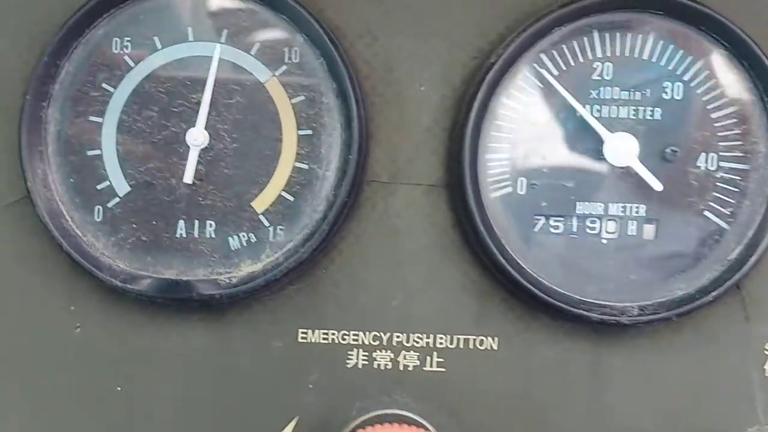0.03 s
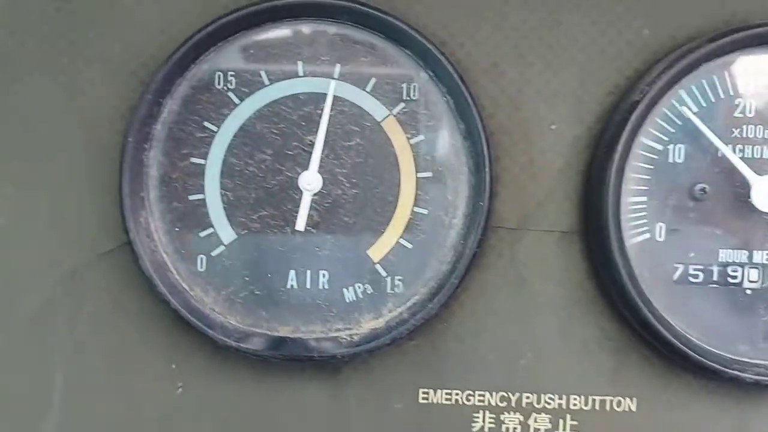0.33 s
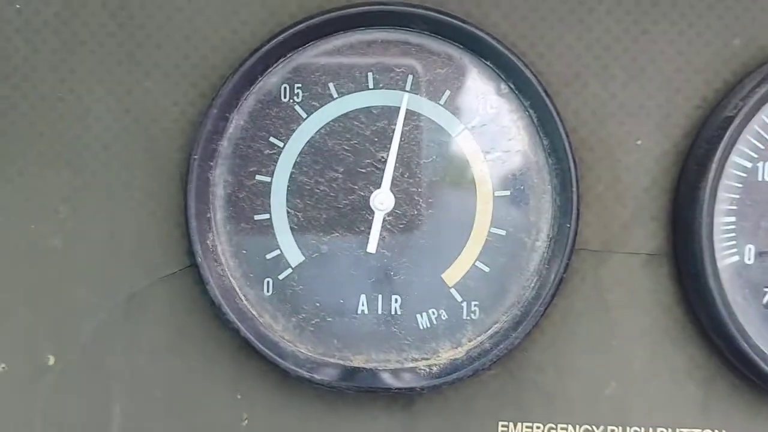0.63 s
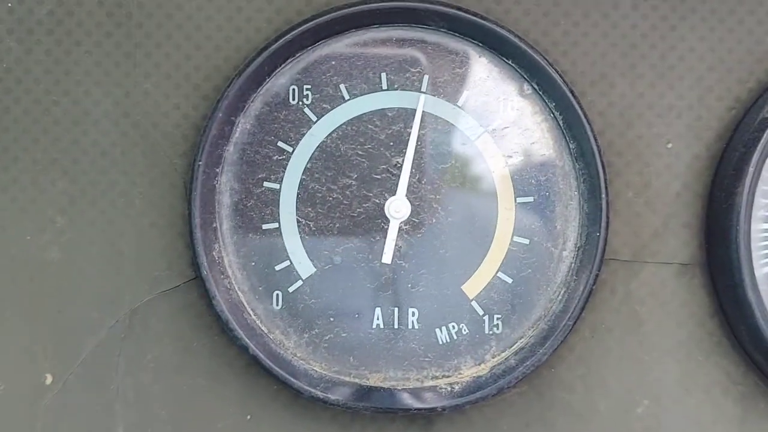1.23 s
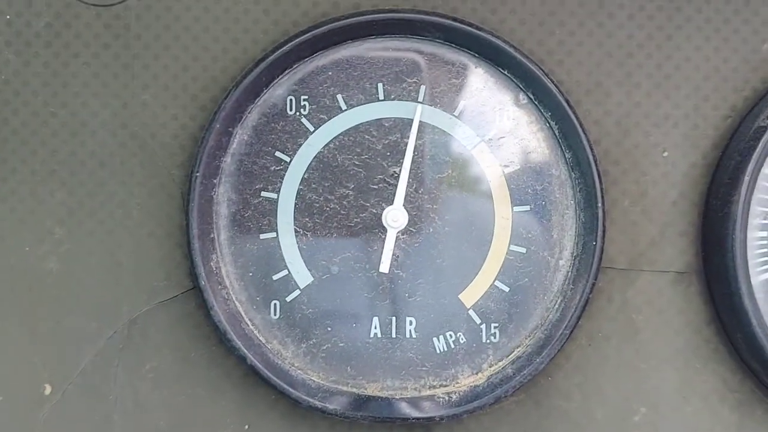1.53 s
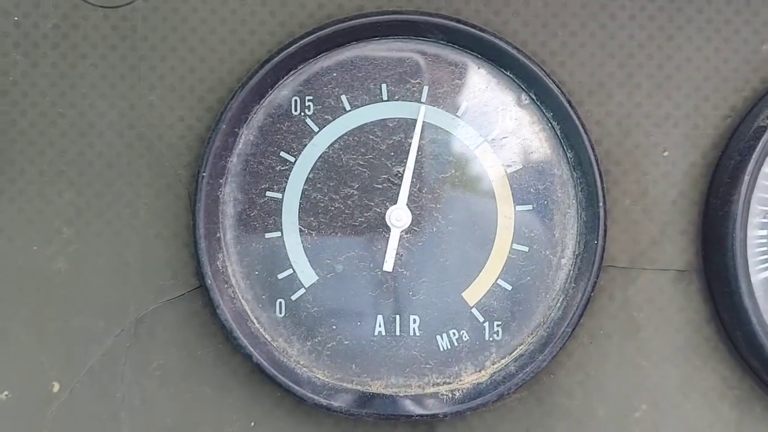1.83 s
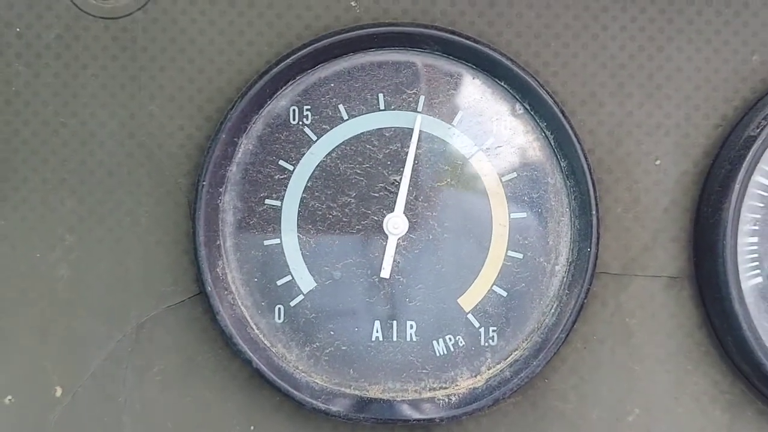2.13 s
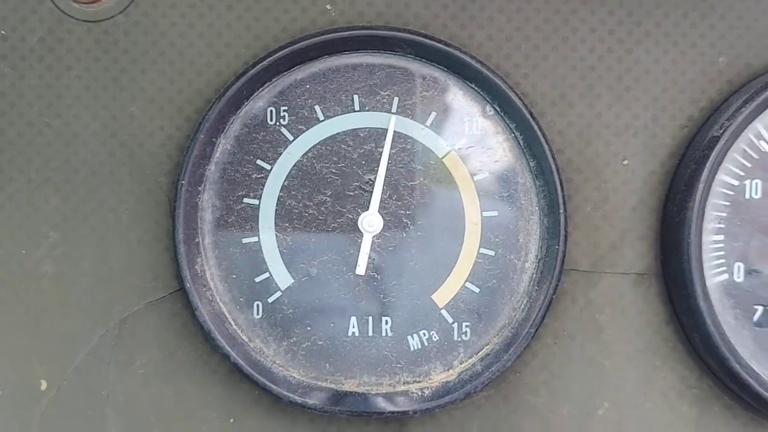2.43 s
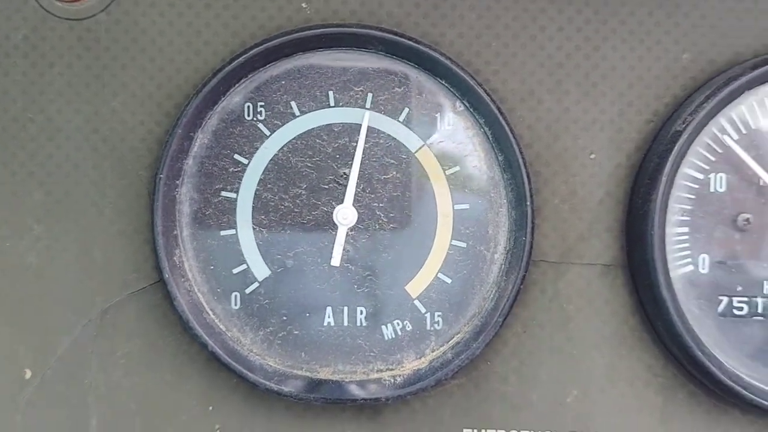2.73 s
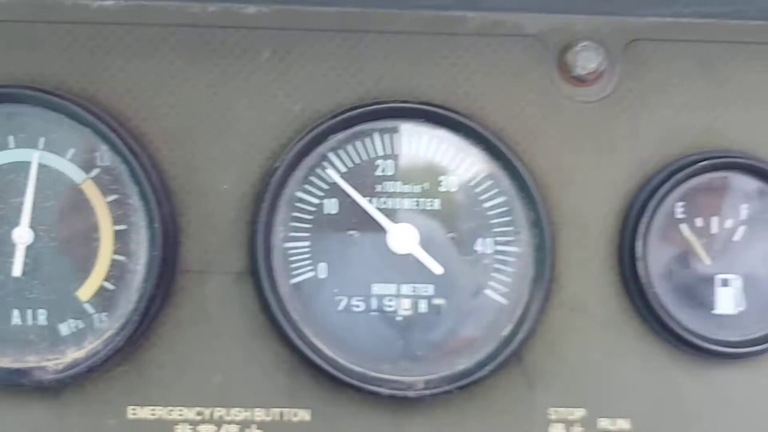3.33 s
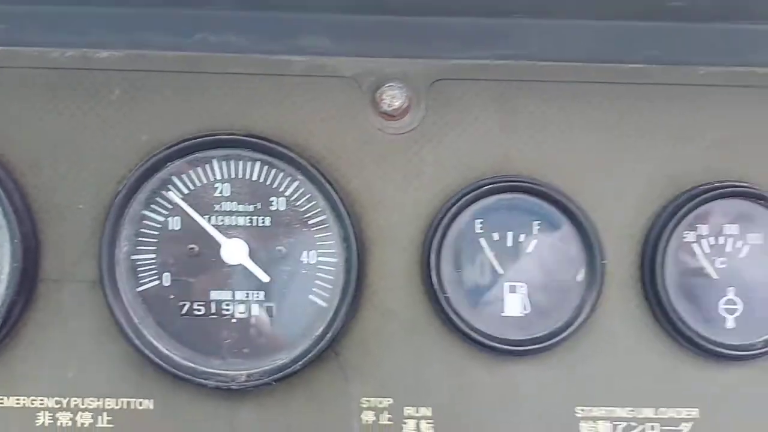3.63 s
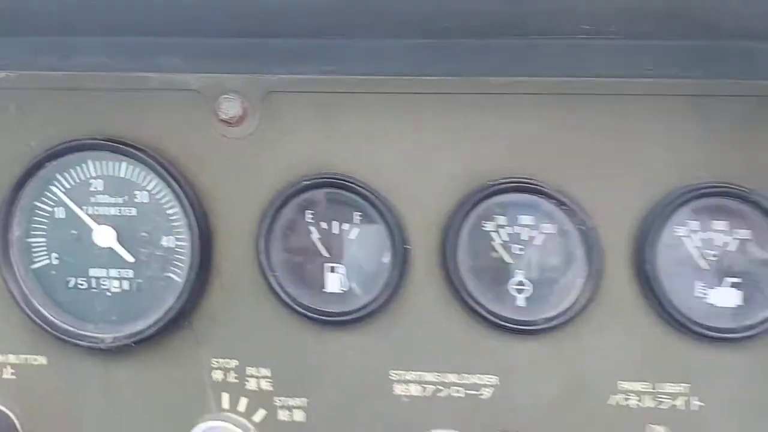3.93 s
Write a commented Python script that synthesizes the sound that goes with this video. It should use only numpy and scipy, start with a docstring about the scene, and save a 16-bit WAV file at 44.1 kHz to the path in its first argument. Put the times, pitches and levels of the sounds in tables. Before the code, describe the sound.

Close to its control panel, a diesel-driven air compressor drones and throbs at constant speed, with humming, buzzing and softly hissing cooling air. As the microphone moves along the panel, the drone dips a little and the whirr grows.

```python
"""A four-cylinder diesel drones and throbs as it drives an air compressor, heard by the control panel.
Its firings make a stack of low tones and pulse the exhaust rumble; the housing buzzes on every cycle.
The rotor lobes hum, fan and drive add a few tones, and cooling air whirrs and hisses. Towards the end
the listener moves along the panel: the drone eases a little and the whirr comes forward."""
import sys
import numpy as np
from scipy import signal
from scipy.fft import rfft, irfft
from scipy.io import wavfile
from scipy.ndimage import uniform_filter1d, minimum_filter1d

SR = 44100
rng = np.random.default_rng(int(sys.argv[2]) if len(sys.argv) > 2 else 0)


def waveform_to_disk(signal):
    """Save audio, clipped to [-1, 1], as 16-bit WAV at the path in sys.argv[1]."""
    frames = np.transpose(np.atleast_2d(signal))
    scaled = np.clip(frames, -1, 1) * 32767
    samples = np.round(scaled).astype(np.int16)
    wavfile.write(sys.argv[1], SR, samples)


N = 176400
CRANK_HZ, FIRINGS_PER_TURN = 1392.1 / 60, 2


def from_db(db):
    """Decibels to gain."""
    return 10 ** (np.asarray(db) / 20)


def fader(rows):
    """Gain at every sample, from rows of seconds and dB."""
    return from_db(np.interp(np.arange(N) / SR, *np.transpose(rows)))


def at_hz(rows, hz, column=1):
    """One column of a spectrum table, read on a log-frequency axis."""
    rows = np.array(rows)
    return np.interp(np.log(np.maximum(hz, 1)), np.log(rows[:, 0]), rows[:, column])


def drift(rate_hz):
    """Smooth random motion with a spread of 1."""
    hop, settle = 100, 2000
    pole = np.exp(-2 * np.pi * rate_hz * hop / SR)
    noise = rng.standard_normal(N // hop + settle + 2)
    slow = signal.lfilter([1], [1, -2 * pole, pole * pole], noise)[settle:]
    return np.interp(np.arange(N) / hop, np.arange(len(slow)), (slow - slow.mean()) / slow.std())


def turns_at(hz, wander):
    """Running count of cycles at a rate that wanders by a small fraction."""
    return np.cumsum(hz * (1 + wander * drift(1.5))) / SR


def split(x, hz):
    """The parts below and above a crossover."""
    low = irfft(rfft(x) / (1 + (np.fft.rfftfreq(N, 1 / SR) / hz) ** 6), N)
    return low, x - low


def partial(turns, hz, ears_db, waver_db):
    """A wavering stereo sine; the ears part in phase as pitch rises, by one radian at 600 Hz."""
    apart = rng.choice([-1, 1]) * min((hz / 600) ** 1.6, 2) * np.array([[.5], [-.5]])
    level_db = np.array(ears_db)[:, None] + waver_db * drift(rate_hz=1)
    return np.sqrt(2) * from_db(level_db) * np.sin(2 * np.pi * turns + apart)


def even_running(orders, levels, tries=100, exhaust_top_hz=200):
    """Start phases in turns: low firing orders line up, the rest take the scatter that lopes least."""
    exhaust = orders * CRANK_HZ < exhaust_top_hz
    starts = rng.random((len(orders), tries))
    starts[exhaust & (orders % FIRINGS_PER_TURN == 0)] = 0
    phasors = (levels * exhaust)[:, None] * np.exp(2j * np.pi * starts)
    lope = 0
    for gap in (.5, 1):  # orders this close beat slower than the firings
        neighbours = (orders[:, None] - orders == gap) @ phasors
        lope += abs(np.sum(phasors.conj() * neighbours, axis=0)) ** 2
    return starts[:, np.argmin(lope)]


# The drone's tones. Each row: multiple of the crank speed, left level in dB, right level in dB.
ENGINE_ORDERS = [(2.0, -37.5, -39), (4.0, -16, -16.5), (5.0, -44, -65), (5.5, -35, -28.5),
                 (6.0, -19.5, -20), (6.5, -26.5, -25.5), (7.0, -25.5, -27), (7.5, -42.5, -41),
                 (8.0, -24, -22.5), (9.0, -40, -43), (9.5, -36.5, -43.5), (10.0, -36.5, -41),
                 (10.5, -38, -45), (11.5, -37, -31.5), (12.0, -46, -34), (12.5, -60, -41),
                 (13.0, -30.5, -29.5), (13.5, -33.5, -39.5), (14.0, -35.5, -48), (14.5, -26, -29.5),
                 (15.0, -37, -31), (15.5, -32, -36.5), (16.0, -30, -36), (16.5, -35.5, -33.5),
                 (17.5, -56, -36), (18.0, -34, -42.5), (18.5, -38, -40), (19.0, -39.5, -39.5),
                 (19.5, -50, -38), (20.0, -36, -30), (21.5, -41.5, -36.5), (22.0, -33.5, -39.5),
                 (22.5, -39, -43), (23.0, -57, -44.5), (23.5, -49, -43), (24.0, -65, -49), (24.5, -66, -58),
                 (26.0, -66, -48), (28.0, -46, -47), (28.5, -51, -45.5)]

def engine(crank):
    """Multiples of the firing rate form exhaust pulses; unequal cylinders add the orders between."""
    table, drone = np.array(ENGINE_ORDERS), np.zeros((2, N))
    orders, ears = table[:, 0], table[:, 1:]
    starts = even_running(orders, from_db(ears.mean(axis=1)))
    for order, ears_db, start in zip(orders, ears, starts):
        waver_db = 1.82 if order % FIRINGS_PER_TURN else .52  # firing orders hold steadier
        drone += partial(order * crank + start, order * CRANK_HZ, ears_db, waver_db)
    return drone


# Stereo image of the noise. Each row: frequency in Hz, left-right correlation (1 is mono).
EAR_LIKENESS = [(30, 0.62), (60, 0.84), (110, 1), (180, 0.99), (250, 0.96), (350, .82), (500, 0.87),
                (700, 0.21), (1300, -0.25), (2500, -0.0061)]

def ear_noise(hz, size):
    """Spectrum of stereo white noise, centred in the bass and wide in the treble."""
    mid, side = rfft(rng.standard_normal((2, size)))
    alike = np.clip(at_hz(EAR_LIKENESS, hz), -.99, .99)
    return np.sqrt((1 + alike) / 2) * mid + np.sqrt((1 - alike) / 2) * side * [[1], [-1]]


# Tone colour of the panels. Each row: frequency in Hz, level per harmonic in dB.
PANEL_BUZZ = [(60, -54), (250, -54), (520, -55), (700, -61), (1100, -64.5), (1700, -72), (3000, -82.5),
              (5000, -89)]

def housing(crank, size=8192):
    """The panels buzz in a dense pattern that repeats every two turns of the crank."""
    hz = np.arange(size // 2 + 1) * CRANK_HZ / 2
    colour = from_db(at_hz(PANEL_BUZZ, hz)) * (hz > PANEL_BUZZ[0][0]) * (hz < PANEL_BUZZ[-1][0])
    cycle = irfft(ear_noise(hz, size) * colour, size) * np.sqrt(size / 2)
    return np.array([np.interp(crank / 2 * size, np.arange(size), ear, period=size) for ear in cycle])


# The hum's partials. Each row: multiple of the lobe rate, left level in dB, right level in dB.
ROTOR_PARTIALS = [(1, -28, -28), (2, -29.5, -33.5), (3, -44, -38), (4, -49, -47.5), (5, -50, -47.5),
                  (6, -52.5, -54), (7, -62, -53), (8, -52.5, -58), (12, -65, -62), (13, -61, -57)]
# Fader on the second and third partials. Each row: time in seconds, gain in dB.
OVERTONE_FADER = [(0, 3.5), (.9, 2.5), (1.45, 2.5), (1.8, -1.5), (2.4, -6.5), (3.2, -0.5), (4, -3)]

def rotors(lobe_hz=212.43):
    """The compressor's rotor lobes hum at their passing rate and its overtones."""
    lobes, hum = turns_at(lobe_hz, wander=.001785), np.zeros((2, N))
    for harmonic, *ears_db in ROTOR_PARTIALS:
        tone = partial(harmonic * lobes + rng.random(), harmonic * lobe_hz, ears_db, waver_db=2)
        hum += tone * (fader(OVERTONE_FADER) if harmonic in (2, 3) else 1)
    return hum


# Fan and drive tones. Each row: pitch in Hz, left level in dB, right level in dB.
FAN_TONES = [(471.5, -33.5, -30), (802, -54.5, -48), (1110, -52, -51.5), (3780, -63, -71)]

def fan_and_drive():
    """The spinning fan and drive sing single tones, each wavering on its own."""
    return sum(partial(turns_at(hz, wander=.00186), hz, ears_db, waver_db=3)
               for hz, *ears_db in FAN_TONES)


# Fader on the mid-range whirr as the listener moves. Each row: time in seconds, gain in dB.
WHIRR_FADER = [(0, -0.5), (1.2, -0.8), (2.2, -.6), (2.9, 1.1), (3.5, 0.5), (4, 3.3)]
# Fader on the hiss. Each row: time in seconds, gain in dB.
HISS_FADER = [(0, 0.5), (1.2, -0.36), (2.8, -0.4), (3.3, -0.5), (4, 1.2)]
# Brief lifts of the top end. Each row: centre in seconds, half width in seconds, boost in dB.
TREBLE_SWELLS = [(3.235, 0.018, 7), (3.80, .024, 3.5), (3.93, 0.035, 4)]

def cooling_air(noise):
    """Rushing air flutters lightly: a whirr below, and a hiss whose treble swells briefly."""
    t = np.arange(N) / SR
    whirr, upper = split(noise, hz=1500)
    hiss, treble = split(upper, hz=6000)
    swell_db = sum(db * np.exp(-.5 * ((t - centre) / width) ** 2) for centre, width, db in TREBLE_SWELLS)
    hiss += treble * from_db(swell_db)
    flutter = from_db(.53 * drift(rate_hz=18))
    return (whirr * fader(WHIRR_FADER) + hiss * fader(HISS_FADER)) * flutter


# Base colour of exhaust and air. Each row: frequency in Hz, left and right density in dB per Hz.
RUSH_COLOUR = [(20, -76, -76), (35, -61, -55), (55, -53, -50.5), (80, -59, -51.5), (116.5, -42, -42),
               (152.6, -41, -39.5), (182, -51, -51.5), (242, -47, -48.5), (282, -44.5, -47),
               (338, -44, -42), (387, -52.5, -55.5), (509, -52, -50.5), (560, -58, -60),
               (756, -68.5, -64.5), (868, -64, -62.5), (940, -68, -68), (1070, -67.5, -68),
               (1400, -73, -71.5), (2010, -74.5, -77), (2660, -78.5, -82), (3040, -82.5, -85),
               (3550, -80.5, -83), (4400, -88, -86), (4960, -86, -83.5), (5920, -92, -89.5),
               (6800, -93, -90), (8050, -101, -92.5), (9150, -110, -91), (10500, -108, -91),
               (11500, -102, -90), (13000, -101, -94), (14300, -97, -95), (15500, -97, -97)]

def exhaust_and_air(crank, rumble_throb=.17, air_throb=.09, delay_s=.0012):
    """Exhaust rumble below and cooling air above, both throbbing with each firing."""
    hz = np.fft.rfftfreq(N, 1 / SR)
    colour = from_db([at_hz(RUSH_COLOUR, hz, column) for column in (1, 2)])
    noise = irfft(ear_noise(hz, N) * colour, N) * np.sqrt(SR / 2)
    low, upper = split(noise, hz=606)
    beat = np.cos(2 * np.pi * FIRINGS_PER_TURN * (crank - delay_s * CRANK_HZ))
    rumble = low * from_db(-.5) * (1 + rumble_throb * beat)
    air = cooling_air(upper) * (1 + air_throb * beat)
    return rumble, air


# Fader on engine and rumble as the listener moves. Each row: time in seconds, gain in dB.
DRONE_FADER = [(0, 0.1), (.5, 0), (2.0, 0.46), (2.9, 0.15), (3.5, -0.9), (4, -2.5)]

def scene():
    """All layers run throughout; one crankshaft times the drone, the buzz and the throb."""
    crank = turns_at(CRANK_HZ, wander=.0007)
    rumble, air = exhaust_and_air(crank)
    drone = (engine(crank) + rumble) * fader(DRONE_FADER)
    return drone + housing(crank) + rotors() + fan_and_drive() + air


def record(dry, cutoff_hz=15700, ceiling=.92, smooth_s=.006):
    """A steep high cut, then a limiter that eases down any peak over the ceiling."""
    x = signal.sosfiltfilt(signal.ellip(10, .05, 60, cutoff_hz, fs=SR, output="sos"), dry)
    size = int(smooth_s * SR)
    gain = minimum_filter1d(ceiling / np.maximum(abs(x).max(axis=0), ceiling), 2 * size + 1)
    return x * uniform_filter1d(uniform_filter1d(gain, size), size)


dry = scene()
out = record(dry)
waveform_to_disk(out)
```